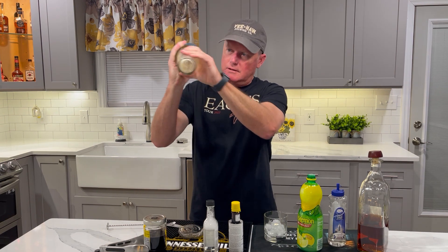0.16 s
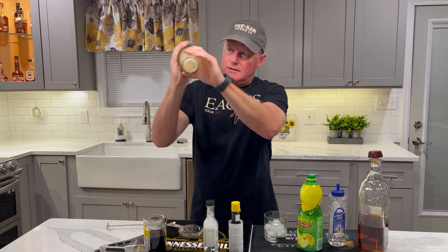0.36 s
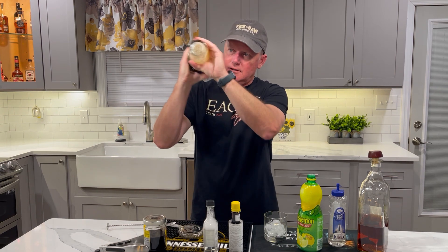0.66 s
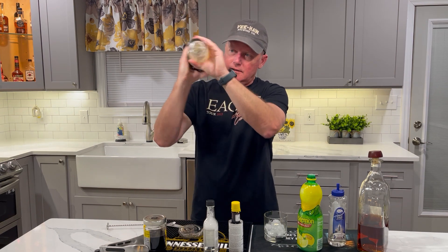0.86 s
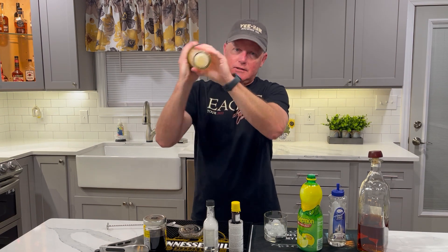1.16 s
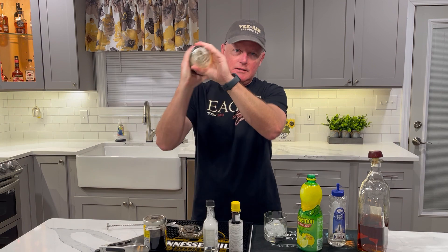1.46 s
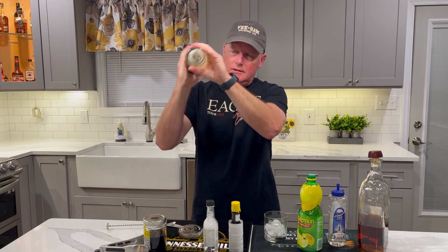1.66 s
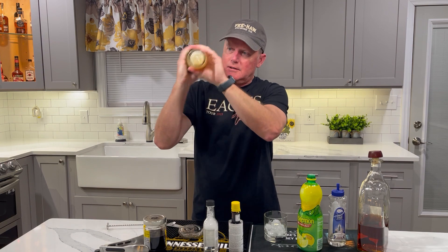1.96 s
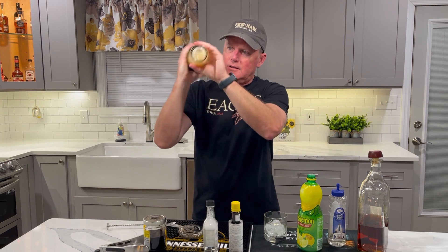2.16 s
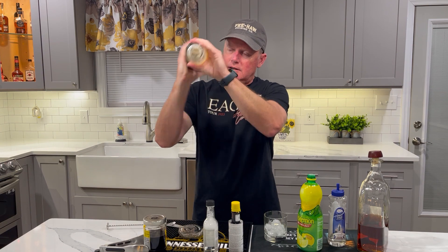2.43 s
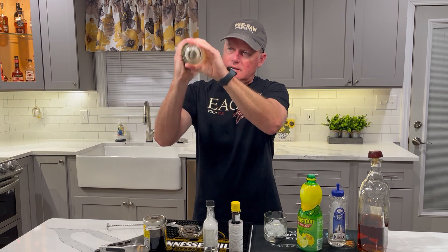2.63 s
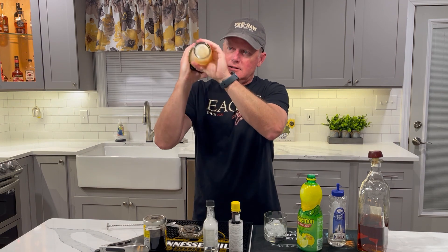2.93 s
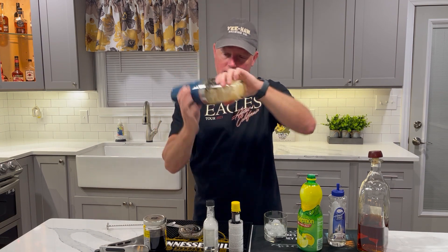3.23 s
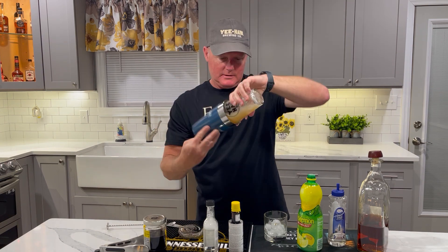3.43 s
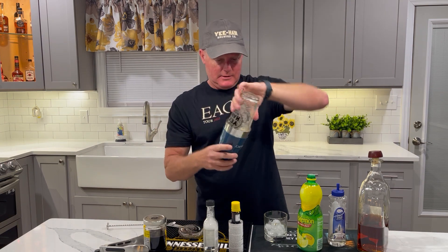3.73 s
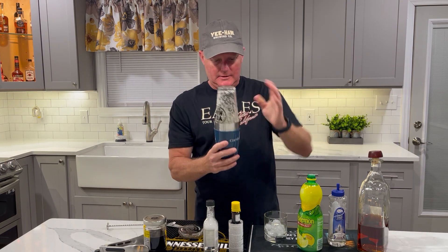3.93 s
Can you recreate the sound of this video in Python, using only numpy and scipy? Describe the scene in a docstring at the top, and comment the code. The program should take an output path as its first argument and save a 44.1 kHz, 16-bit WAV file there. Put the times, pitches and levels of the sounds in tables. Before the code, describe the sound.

A cocktail shaker is shaken fast, ice clattering and drink sloshing, until the last cubes settle softly.

```python
"""Over the faint hum of a tiled kitchen, ice is shaken hard in a steel tin capped with a mixing glass.
Small pieces rattle from the start. About five times a second, ice and drink slam into one end with a
hollow knock and a trail of bubbles, while whole cubes clatter on the steel and the tiles echo.
After a little over three seconds the shaking stops and the shaker is turned upright:
the drink gurgles down into the tin and the last cubes settle."""
import sys
import numpy as np
from scipy import signal
from scipy.fft import rfft, irfft, next_fast_len
from scipy.io import wavfile

SR = 44100
rng = np.random.default_rng(int(sys.argv[2]) if len(sys.argv) > 2 else 0)


def inscribe(sig):
    """Save sig as 16-bit PCM at rate SR to the path in sys.argv[1].

    A 1-D sig is mono; a 2-D sig holds one channel per row.
    Samples are clipped to [-1, 1] before scaling.
    """
    pcm = np.round(np.clip(np.atleast_2d(sig).T, -1, 1) * 32767)
    wavfile.write(sys.argv[1], SR, pcm.astype(np.int16))


N = 180184

# Ice and drink land in two blows at each end of a shake:
# (time [s], level [dB], pitch [Hz], wait for the second blow [s], level of the second blow [dB])
SLAMS = [(0.016, -37.5, 1140, 0.011, -41), (0.157, -30, 1330, 0.014, -42),
         (0.332, -32.5, 1100, .006, -29.5), (0.524, -26.5, 1340, .011, -29.5),
         (0.719, -28, 1070, 0.0091, -32), (0.896, -40, 830, .025, -32), (1.108, -30.5, 965, .013, -30),
         (1.291, -31.5, 1080, 0.035, -33), (1.5, -33, 1270, 0.021, -31), (1.698, -30.5, 920, 0.01, -29),
         (1.888, -34.5, 1210, .023, -35), (2.085, -37.5, 1170, 0.011, -34.5), (2.274, -31, 1470, .008, -39),
         (2.467, -28, 1260, .006, -34.5), (2.651, -31, 910, 0.015, -48), (2.843, -44, 1060, 0.0066, -37),
         (2.99, -32.5, 1170, 0.024, -31.5), (3.189, -43, 1240, 0.014, -53), (3.358, -41, 1110, 0.0048, -65)]
# The hardest cube hits, then the last cubes settling:
# (time [s], level [dB], extra treble [dB], extra ring of the tin's two lowest tones [dB])
CUBE_HITS = [(0.181, -33, 7, -12), (0.239, -29, 16, 0), (0.285, -30, 9, -3), (0.344, -28, -3, -2),
             (0.388, -31.5, -21, 4), (0.436, -29.5, -21, 12), (0.595, -28, -4, 2), (0.64, -29, -2, -2),
             (0.664, -28, -30, -6), (0.683, -30.5, 27, 2), (0.704, -30.5, -7, -12), (0.735, -27.5, -10, 8),
             (0.859, -37, -13, -6), (0.879, -27.5, -19, -17), (0.919, -30, 4, -18), (1.005, -30, -19, -1),
             (1.05, -24, -3, -20), (1.081, -26, -2, -20), (1.13, -28, -8, -24), (1.254, -25.5, -3, 2.5),
             (1.283, -27.5, 12, -7), (1.48, -29, -12, -1.5), (1.598, -31, 12, -9), (1.655, -32, 4, -5),
             (1.757, -29.5, 3, -4), (1.873, -34, 6, -4), (1.98, -31, 6, 4), (2.015, -32.5, 3, -16),
             (2.031, -31.5, 5, -11), (2.042, -30.5, 7, -26), (2.193, -28.5, 15, -8), (2.198, -33.5, 9, -11),
             (2.233, -30, 9, -15), (2.275, -27, -8, -3), (2.291, -37, -13, -11), (2.418, -29.5, 12, -2),
             (2.478, -26.5, 1, -12), (2.652, -34, 14, 17), (2.676, -24.5, 3, -1.5), (2.798, -34.5, 15, -1),
             (2.918, -31, 5, 0), (3.013, -28.5, -6, 6), (3.084, -30.5, 4, -1), (3.165, -33.5, 14, -18),
             (3.217, -39, 9, -3), (3.303, -33, -14, 2), (3.342, -27.5, 3, 1.5), (3.361, -32.5, 4, 16),
             (3.367, -27.5, 3, -1), (3.529, -46.5, -12, 5), (3.562, -46, 16, 25), (3.597, -42.5, 3, 9),
             (3.611, -39.5, -20, -3), (3.661, -38.5, -7, -3), (3.683, -34.5, -10, 14), (3.69, -35.5, 3, -5),
             (3.73, -36, -4, 7.5), (3.843, -47.5, -1, 6), (3.955, -47.5, -7, -2), (4.006, -45, -10, -20),
             (4.025, -40.5, -6, 18)]
SHAKE_END_S = 3.25
SIZE = 2048  # samples in one short sound, such as a hit or a bubble
HZ, AGE = np.fft.rfftfreq(SIZE, 1 / SR), np.arange(SIZE) / SR  # its frequencies [Hz] and times [s]


def amp(db):
    """Turn decibels into a number to multiply by."""
    return 10 ** (np.asarray(db) / 20)


def unit(x):
    """Scale a sound to an average power of 1."""
    return x / np.sqrt(np.mean(x ** 2) + 1e-20)


def even(rows):
    """Give each row a total energy of 1."""
    return rows / (np.linalg.norm(rows, axis=-1, keepdims=True) + 1e-12)


def along(points, hz):
    """Read between (frequency [Hz], value) points, with octaves evenly spaced."""
    point_hz, values = np.transpose(points)
    return np.interp(np.log(hz + 1), np.log(point_hz + 1), values)


def filtered(x, response):
    """Turn each frequency of x up or down by response(frequency)."""
    padded = next_fast_len(N + SR // 2)
    return irfft(rfft(x, padded) * response(np.fft.rfftfreq(padded, 1 / SR)), padded)[:N]


def tone_filter(points):
    """A filter through (frequency [Hz], level [dB]) points that never sounds ahead of the hit."""
    cepstrum = irfft(np.log(amp(along(points, HZ))))
    cepstrum[1:SIZE // 2] *= 2
    cepstrum[SIZE // 2 + 1:] = 0
    return np.exp(rfft(cepstrum))


def resonances(tones, hz=HZ):
    """One ringing filter per (pitch [Hz], width [Hz], level [dB]); every other one is flipped."""
    return np.array([(-1) ** k * amp(db) * 1j * hz * width / (pitch ** 2 - hz ** 2 + 1j * hz * width)
                     for k, (pitch, width, db) in enumerate(tones)])


def contact(count, fade_s, snap):
    """The frequencies in each hit's push: a sharp first touch, then brief chatter."""
    force = even(rng.standard_normal((count, SIZE)) * amp(-60 * AGE / np.reshape(fade_s, (-1, 1))))
    force[:, 0] += snap
    return rfft(force)


def place(times, db, waves):
    """Add short sounds at their times; db is the level their energy would have over 2 ms."""
    samples = np.round(np.clip(times, 0, None) * SR).astype(int)[:, None] + np.arange(SIZE)
    gain = amp(db) * np.sqrt(.002 * SR)
    return np.bincount(samples.ravel(), (gain[:, None] * even(waves)).ravel(), N)[:N]


def scattered(count, end_s):
    """Random times, one in each equal slot up to end_s."""
    return (np.arange(count) + rng.uniform(0, 1, count)) * end_s / count


def background(hum_hz=53.2):
    """Room air and the low hum of an appliance."""
    # The hush of still air: (frequency [Hz], level [dB])
    hush = [(20, -11), (40, -0.5), (90, -7), (200, -9.5), (400, -10), (1000, -18.5), (3000, -20),
            (8000, -35), (15000, -45)]
    air = unit(filtered(rng.standard_normal(N), lambda hz: amp(along(hush, hz))))
    return amp(-64.5) * air + amp(-65.5) * np.sin(2 * np.pi * hum_hz * np.arange(N) / SR)


def draught():
    """Slow air currents make a very deep rumble, more while the arms pump."""
    # The swaying air: (frequency [Hz], level [dB])
    sway = [(1, 23), (5, -15), (11, 18), (22, -9.5), (40, -16), (120, -82), (400, -120)]
    effort = amp(np.interp(np.arange(N) / SR, [0, 2.9, 3.3, 4.1], [-44.5, -42, -49, -46]))
    return effort * unit(filtered(rng.standard_normal(N), lambda hz: amp(along(sway, hz))))


def churn(times, surge_db=1, muffle_db=13):
    """Level and treble [dB] of loose ice: it swells before each slam, then the drink muffles it."""
    # How hard the small pieces churn: (time [s], level [dB])
    strength = [(0.0, -37.5), (1.24, -39), (1.59, -39.5), (1.86, -39), (2.68, -39.5), (3.0, -42),
                (3.45, -62.5), (3.58, -57.5), (3.84, -69), (4.09, -91)]
    slam_times = np.transpose(SLAMS)[0]
    phase = np.interp(times, slam_times, np.arange(len(slam_times))) % 1  # 0 to 1 between slams
    surge = surge_db * np.cos(2 * np.pi * (phase - .88)) * (times < SHAKE_END_S)
    covered = np.exp(-((phase - .3) / .1) ** 2)
    return np.interp(times, *np.transpose(strength)) + surge, -muffle_db * covered


def ice_on_wall(times, db, treble_db, low_db, chatter_s):
    """Each hit cracks and rings the steel; where it lands sets how strong each tone is."""
    # The tin's tones, dulled by hands and drink: (pitch [Hz], width [Hz], level [dB])
    wall_tones = [(1720, 190, 2.5), (2133, 167, -3.5), (2984, 190, 4), (3307, 61, 6), (3593, 380, -2.5),
                  (5335, 706, 2), (7750, 140, -18)]
    # The crack of ice on steel: (frequency [Hz], level [dB])
    crack_shape = [(100, -29), (450, -11.5), (1100, -11.5), (1700, -17), (2400, -0.5), (3600, 0.5),
                   (5600, 9.5), (7200, -3), (10000, -14.5), (15500, -32)]
    count = len(times)
    force = contact(count, fade_s=chatter_s, snap=.3)
    tone_db = rng.normal(0, 4, (count, len(wall_tones)))
    tone_db[:, :2] += low_db[:, None]
    detune = np.exp(.018 * rng.standard_normal((count, 1)))  # the moving drink shifts the tones
    wall = np.einsum("ht,thf->hf", amp(tone_db), resonances(wall_tones, HZ * detune))  # sum the tones
    ring = even(irfft(force * wall))
    crack = even(irfft(force * tone_filter(crack_shape)))
    # a harder, drier hit is brighter
    treble_lift = tone_filter([(3500, 0), (10000, .85)])
    brightness = np.exp(np.outer(treble_db, np.log(treble_lift)))
    return place(times, db, irfft(rfft(ring + amp(-1.5) * crack) * brightness))


def chips(count=600):
    """Small pieces patter without pause while the shaker moves."""
    times = scattered(count, N / SR)
    db, treble_db = churn(times)
    size, hardness, spot = rng.standard_normal((count, 3)).T
    return ice_on_wall(times, db + 1 + 1.7 * size, treble_db - 2.5 + 3 * hardness,
                       low_db=3 * spot + .46, chatter_s=.053)


def splinters(count=650):
    """Slivers break off the cubes in a fizz of tiny bright ticks."""
    times = rng.uniform(0, N / SR, count)
    db, treble_db = churn(times)
    return ice_on_wall(times, db - 4 + rng.normal(0, 1.2, count), treble_db + 19,
                       low_db=np.full(count, -10), chatter_s=.021)


def slams():
    """The drink cushions each slam: a hollow knock that rings the air in the shaker."""
    # A blow softened by the drink: (frequency [Hz], level [dB])
    thud_shape = [(100, -9.5), (300, -14.5), (550, -4), (800, 0), (1400, 0), (2000, 2.5), (3000, -19),
                  (8000, -64)]
    # Tones of the air pocket above the drink: (pitch [Hz], width [Hz], level [dB])
    pocket_tones = [(450, 25, -15), (685, 40, -10), (803, 25, -2), (895, 22, 0), (1015, 40, -6),
                    (1215, 22, 6), (1500, 50, -5)]
    first_s, first_db, pitch, wait_s, second_db = np.transpose(SLAMS)
    times = np.r_[first_s, first_s + wait_s]
    force = contact(len(times), fade_s=.04, snap=1.3) * tone_filter(thud_shape)
    knock = even(irfft(force * resonances([(hz, 450, 0) for hz in np.r_[pitch, pitch]])))
    pocket = even(irfft(force * resonances(pocket_tones).sum(axis=0)))
    return amp(2) * place(times, np.r_[first_db, second_db], knock + amp(-3.5) * pocket)


def bubbles(times, db, typical_hz=850):
    """Each bubble rings for about a dozen cycles at a pitch set by its size."""
    cycles = typical_hz * np.exp(.418 * rng.standard_normal((len(times), 1))) * AGE
    rings = np.sin(2 * np.pi * cycles) * amp(-60 * cycles / 12)
    return place(times, db + rng.normal(0, 3.4, len(times)), rings)


def slosh(per_slam=28):
    """Each slam leaves a short, fading trail of bubbles."""
    times, first_db, _, _, second_db = np.repeat(SLAMS, per_slam, axis=0).T
    delay_s = rng.exponential(.055, len(times))
    return bubbles(times + delay_s, np.maximum(first_db, second_db) - 24 - 55 * delay_s)


def tumble(count=95):
    """Lighter cube hits fall at random between the hard ones."""
    times = scattered(count, SHAKE_END_S)
    db, treble_db = churn(times)
    size, hardness, spot = rng.standard_normal((count, 3)).T
    return ice_on_wall(times, db + 7 + 1.9 * size, treble_db + 4.5 + 5 * hardness,
                       low_db=8 * spot - 2.5, chatter_s=.024)


def cubes():
    """Whole cubes hit the wall; they chatter longer while the shaking lasts."""
    times, db, treble_db, low_db = np.transpose(CUBE_HITS)
    return ice_on_wall(times, db, treble_db, low_db, chatter_s=np.interp(times, [3.1, 3.3], [.018, .011]))


def clumps(per_cube=3):
    """While the ice is thrown about, each cube arrives among a few smaller neighbours."""
    shaken = [hit for hit in CUBE_HITS if hit[0] < SHAKE_END_S]
    times, db, treble_db, low_db = np.repeat(shaken, per_cube, axis=0).T
    delay_s = rng.normal(.004, .004, len(times))
    neighbour_db = db - 6.5 + rng.normal(0, 2.55, len(times))
    return ice_on_wall(times + delay_s, neighbour_db, treble_db / 2, low_db, chatter_s=.017)


def gurgle(count=18):
    """The drink bubbles down into the tin as the shaker comes upright."""
    times = np.linspace(3.52, 3.74, count) + rng.normal(0, .0061, count)
    return bubbles(times, db=np.linspace(-57, -60, count))


def kitchen_echo(x, patterns=14):
    """Tiles and cupboards throw the sound back; the echo pattern shifts as the shaker moves."""
    # How long the echo lasts: (frequency [Hz], time to fade by 60 dB [s])
    fade_times = [(200, .38), (1000, .42), (3000, .41), (6000, .38), (9000, .32), (15000, .22)]
    # The echo's tone: (frequency [Hz], level [dB])
    colour = [(1000, -1.5), (2000, 0), (5000, -1), (9000, -3.5), (15000, -7)]
    hz, t, noise = signal.stft(rng.standard_normal((patterns, SR // 2)), SR, nperseg=256)
    fade = amp(-60 * t / along(fade_times, hz)[:, None])
    build_up = 1 - np.exp(-t / .007)
    tails = even(signal.istft(noise * fade * build_up, SR, nperseg=256)[1])
    # each pattern blends into the next
    share = np.clip(1 - abs(np.linspace(0, patterns - 1, N) - np.arange(patterns)[:, None]), 0, 1)
    echo = signal.fftconvolve(x * np.sqrt(share), tails, axes=1).sum(axis=0)[:N]
    return filtered(echo, lambda hz: amp(along(colour, hz)))


def scene():
    """The shaker, a couple of metres away in the kitchen."""
    ice = cubes() + clumps() + tumble() + chips() + splinters()
    shaker = ice + slams() + slosh() + gurgle()
    echo = amp(-4.5) * kitchen_echo(shaker)
    return (amp(-1.14) * (shaker + echo) + draught() + background())[None]


def record(dry):
    """Cut away the very highest treble, from 15800 Hz up."""
    return filtered(dry[0], lambda hz: hz < 15800)[None]


dry = scene()
out = record(dry)
inscribe(out)
```